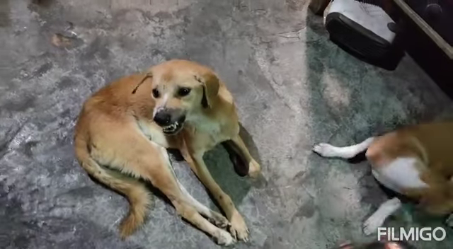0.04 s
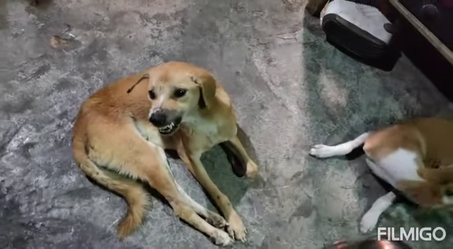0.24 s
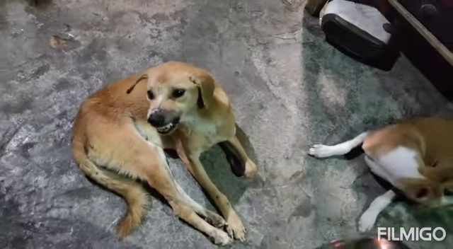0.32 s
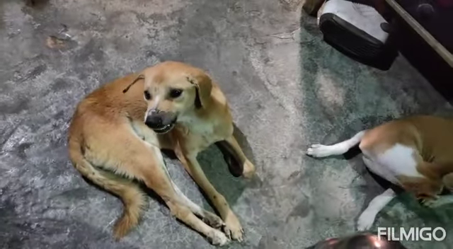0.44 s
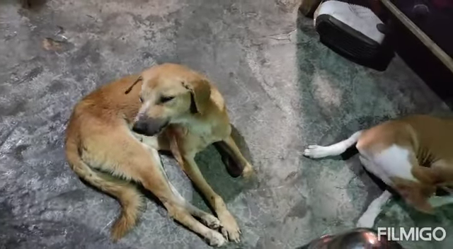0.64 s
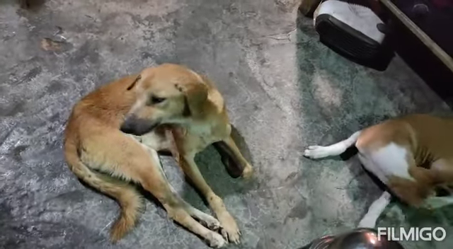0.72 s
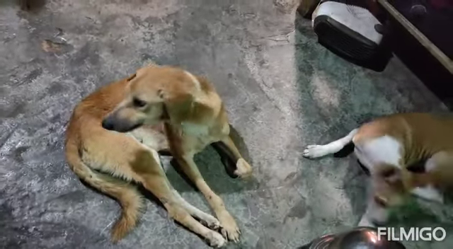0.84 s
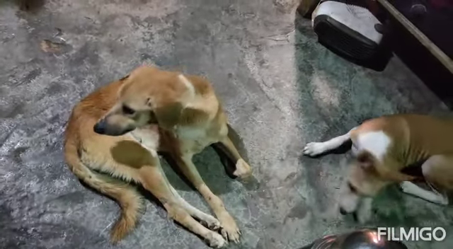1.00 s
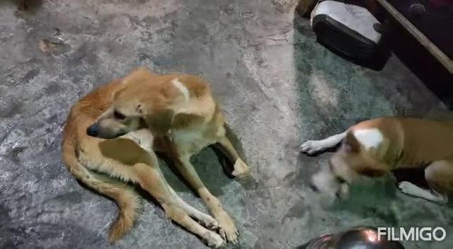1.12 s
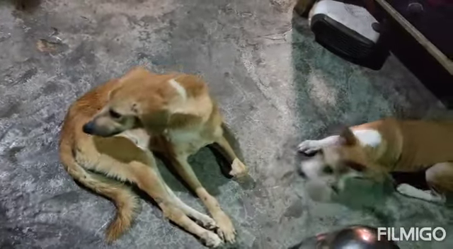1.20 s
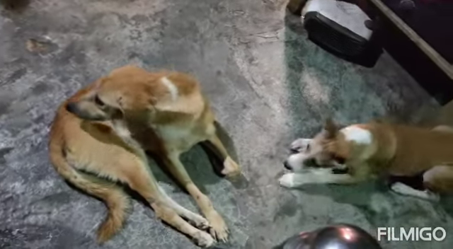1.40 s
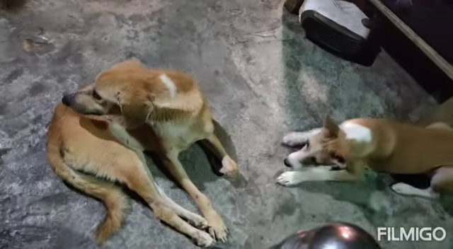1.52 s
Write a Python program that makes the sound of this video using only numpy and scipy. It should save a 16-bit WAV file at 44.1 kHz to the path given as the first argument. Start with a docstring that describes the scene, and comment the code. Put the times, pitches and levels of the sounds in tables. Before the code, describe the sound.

A low, rattling growl comes from a nearby dog, quickening and then slowing away within a second. Faint scuffs from another dog settling on the hard floor continue afterward, slightly left, over a quiet room hum.

```python
"""A quiet room with a hard floor. A dog lying there gives one short, low warning growl: its flapping mouth
beats a rattle that rings chest, mouth and teeth; the rattle speeds up, turns rough over the deep tone of its
vocal folds, then slows to separate beats as the lips close. A second dog shuffles down beside it, paws and fur
scuffing on the floor, with faint, thin whistles of narrow-band noise. The room murmurs, hums and answers with a
short echo."""
import sys
import numpy as np
from scipy import signal
from scipy.fft import rfft, irfft, next_fast_len
from scipy.io import wavfile
from scipy.ndimage import map_coordinates

SR = 44100
rng = np.random.default_rng(int(sys.argv[2]) if len(sys.argv) > 2 else 0)


def store_pcm(level_fs):
    """Save levels as 16-bit WAV."""
    pcm = np.round(np.clip(level_fs, -1, 1) * 32767).astype(np.int16)
    wavfile.write(sys.argv[1], SR, np.atleast_2d(pcm).T)


N = 68355
LEFT_LAG_S = .000379  # scuffs and whistles reach the left ear later


def amp(db):
    """Decibels to gain."""
    return 10 ** (np.asarray(db) / 20)


def unit(x):
    """Scaled to rms 1."""
    return x / np.sqrt(np.mean(x ** 2) + 1e-20)


def along(points, hz):
    """Rows of f/Hz, value, read on a log frequency axis."""
    f, v = np.transpose(points)
    return np.interp(np.log(hz + 1), np.log(f + 1), v)


def curves(rows, t):
    """Automation lanes: each column after the time, read at times t."""
    times, *lanes = np.transpose(rows)
    return [np.interp(t, times, lane) for lane in lanes]


def filtered(x, response):
    """x through an EQ given as a complex response of frequency."""
    size = next_fast_len(N + SR // 2)
    return irfft(rfft(x, size) * response(np.fft.rfftfreq(size, 1 / SR)), size)[..., :N]


def ring(x, colour, size=8192):
    """x rings a minimum-phase body of the given colour and of energy 1."""
    cepstrum = irfft(np.log(amp(along(colour, np.fft.rfftfreq(size, 1 / SR)))))
    cepstrum[1:size // 2] *= 2
    cepstrum[size // 2 + 1:] = 0
    body = irfft(np.exp(rfft(cepstrum)))
    return signal.fftconvolve(x, body / np.linalg.norm(body))[:N]


def resonate(x, hz, width_hz):
    """x through one resonance whose centre moves."""
    carrier = np.exp(2j * np.pi * np.cumsum(hz) / SR)
    pole = np.exp(-np.pi * width_hz / SR)
    return (carrier * signal.lfilter([1 - pole], [1, -pole], x / carrier)).real


def place(x, pan_db, lag_s):
    """Mono to stereo: the left is pan_db(hz) louder and lag_s later than the right."""
    side = np.array([[.5], [-.5]])
    return filtered(x, lambda hz: amp(side * pan_db(hz)) * np.exp(-2j * np.pi * hz * side * lag_s))


def swell(peak_s, rise_s, fade_s):
    """A rise and a fade, each 20 dB over its time."""
    t = np.arange(N) / SR - peak_s
    return amp(-20 * np.where(t < 0, -t / rise_s, t / fade_s))


def murmur(level_db=-60.5, waver_db=.5):
    """Room tone: a dull, steady bed of noise, nearly mono in the bass."""
    # colour of the bed: f/Hz, level/dB
    colour = [(20, -14), (33, -9.5), (45, 7), (62, -6), (85, 0), (112, 3), (150, -6), (260, -2.5),
              (340, -7), (405, -3.5), (455, -9), (545, -4), (640, -12.5), (760, -8.5), (870, -5.5),
              (970, -14), (1100, -28.5), (1500, -42.5), (2100, -47), (2550, -37.5), (3000, -57.5),
              (7000, -48), (10000, -60), (15000, -59)]
    # likeness of left and right: f/Hz, correlation
    likeness = [(60, 1), (250, 0.91), (500, 0.68), (900, .55), (2000, 0.29), (6000, 0)]
    spread = lambda hz: np.arccos(np.clip(along(likeness, hz), -1, 1)) / 2
    mid_side_eq = lambda hz: amp(along(colour, hz)) * [np.cos(spread(hz)), np.sin(spread(hz))]
    mid, side = filtered(rng.standard_normal((2, N)), mid_side_eq)
    waver = map_coordinates(rng.standard_normal(20), [np.arange(N) * 10 / SR])
    return amp(level_db + waver_db * waver) * unit(np.array([mid + side, mid - side]))


def hum():
    """A faint hum in the room: sine tones whose phase drifts slightly."""
    # steady tones: f/Hz, level/dB
    tones = [(403, -75.5), (549, -76.5)]
    t = np.arange(N) / SR
    drift = lambda: map_coordinates(rng.standard_normal(12), [t * 5])
    return sum(amp(db) * np.sqrt(2) * np.sin(2 * np.pi * hz * t + drift()) for hz, db in tones)


def scuffs(grains_per_s=8000, scatter_db=4, edge_slope=9):
    """Fur and pads drag over the gritty floor: dense tiny grains under each stroke."""
    # strokes: peak t/s, level/dB, rise/s, fade/s, pan L-R/dB, low cut/Hz, high cut/Hz
    strokes = [(0.086, -79, .03, 0.1, 5, 3500, 16200), (.172, -67.5, 0.056, 0.24, 3.5, 4180, 16000),
               (0.371, -62, 0.065, 0.1676, 2.5, 4360, 8870), (.652, -72.5, .04, 0.04, 3.5, 6510, 5950),
               (.83, -80, 0.042, 0.07, 6.5, 4300, 7300), (.97, -82.5, 0.029, 0.17, 9, 4970, 9600),
               (1.06, -74, 0.014, 0.22, 7.5, 5540, 12900), (1.275, -83, 0.14, 0, 9.5, 6150, 10000),
               (1.437, -76, 0.095, 0.22, 7, 6000, 11200)]
    # colour of the grit: f/Hz, level/dB
    colour = [(1000, -15), (2500, -7), (3400, -10.5), (4400, -9), (5500, -3), (6200, -2.5), (6720, 5.5),
              (7400, -5), (9000, -8), (11000, -11.5), (15500, -12)]
    out = np.zeros((2, N))
    for peak_s, db, rise_s, fade_s, pan_db, low_hz, high_hz in strokes:
        grains = (rng.random(N) < grains_per_s / SR) * rng.standard_normal(N)
        grains *= amp(scatter_db * rng.standard_normal(N))
        low_cut = lambda hz: 1 / (1 + (low_hz / (hz + 1)) ** edge_slope)
        high_cut = lambda hz: 1 / (1 + (hz / high_hz) ** edge_slope)
        grit = filtered(grains, lambda hz: amp(along(colour, hz)) * low_cut(hz) * high_cut(hz))
        stroke = amp(db) * unit(grit) * swell(peak_s, rise_s, fade_s)
        out += place(stroke, lambda hz: pan_db, LEFT_LAG_S)
    return out


def thin_whistles(pan_db=7.5):
    """Faint, thin whistles on the left: narrow bands of noise that swell and fade."""
    # noise bands: peak t/s, f/Hz, width/Hz, level/dB, rise/s, fade/s
    bands = [(.09, 1545, 89.4, -84.5, .03, .25), (.16, 2375, 250, -82.5, 0.098, 0.4),
             (.45, 6626, 346, -73.5, 0.3, 0.26), (.67, 6700, 500, -73, .03, .15),
             (.735, 3450, 553, -78, .08, 0.13), (1.065, 1370, 111, -81, .04, 0.2),
             (1.07, 1853, 190, -79, .04, 0.1), (1.09, 3300, 280, -79, 0.056, .2),
             (1.26, 4530, 170, -88.5, 0.19, .27), (1.505, 3720, 130, -90, .03, .1)]
    out = np.zeros(N)
    for peak_s, hz, width_hz, db, rise_s, fade_s in bands:
        resonance = lambda f: (1j * f * width_hz / (hz * hz - f * f + 1j * f * width_hz)) ** 2
        whistle = unit(filtered(rng.standard_normal(N), resonance))
        out += amp(db) * whistle * swell(peak_s, rise_s, fade_s)
    return place(out, lambda hz: pan_db, LEFT_LAG_S)


def growl(rough_hz=135, jitter_s=.0008, shimmer_db=1.5):
    """Uneven beats of the flapping mouth, each with a puff of air, ring the chest, mouth and gap in the teeth."""
    # rattle of the flapping mouth: t/s, beat rate/Hz
    flaps = [(.247, 74.1), (.28, 77.5), (.32, 122), (.38, 120.1), (.42, 136.8), (.46, 116.8), (.52, 117.7),
             (.56, 127.4), (.59, 97), (.64, 124.3), (.675, 90), (.71, 91.9), (.745, 73.8), (.785, 86.4),
             (.825, 64.5), (.897, 68.8)]
    # drive of the three registers: t/s, chest level/dB, mouth level/dB, teeth level/dB
    effort = [(.247, -53.5, -52.5, -77), (.274, -47, -46, -67.5), (.3, -48, -46, -68.5),
              (.324, -44.5, -42, -65.5), (.333, -49, -55, -69.5), (.345, -45, -46, -61.5),
              (.365, -46.5, -44.5, -61), (.373, -46.5, -59, -64), (.384, -44, -44, -59),
              (.403, -47.5, -59, -68.5), (.417, -46.5, -49.5, -60.5), (.435, -44, -44.5, -63),
              (.444, -46, -49.5, -62), (.485, -46.5, -43.5, -66.5), (.497, -49, -61, -69.5),
              (.52, -46, -44, -62.5), (.545, -46, -54, -68.5), (.556, -44, -46, -62), (.588, -53, -61, -72),
              (.604, -48, -47.5, -62.5), (.617, -51.5, -56, -71), (.65, -48, -52, -68.5),
              (.71, -48, -52.5, -62), (.775, -50, -56, -68), (.812, -55, -62.5, -77.5),
              (.848, -52, -55.5, -69.5), (.888, -52.5, -62.5, -75)]
    # moving resonances as the lips close: t/s, mouth f/Hz, teeth f/Hz
    jaw = [(.26, 840, 1940), (.37, 845, 2310), (.49, 858, 2304), (.57, 783, 2300), (.68, 825, 2510),
           (.89, 814, 2534)]
    # steady colours of chest, open mouth and muzzle: f/Hz, level/dB
    chest_colour = [(40, -44), (75, -21), (110, -6.5), (150, -2.5), (185, 1.5), (215, -6), (245, -3),
                    (295, -8.5), (345, 1), (385, -12), (435, -12), (490, -22.5), (650, -22), (1300, -61),
                    (3000, -110)]
    mouth_colour = [(300, -26.5), (560, -8), (680, -5.5), (770, -0.5), (870, 1.5), (945, -8), (1070, -12.5),
                    (1200, -10.5), (1400, -23.5), (2000, -47.5), (4000, -90)]
    muzzle_colour = [(900, -14), (1400, 3), (1880, 7), (2150, -2), (2400, 1), (2720, 1), (3050, -9),
                     (3450, -1), (4000, 2), (4550, -22), (7000, -4), (8000, -30)]
    # stereo image of the growl: f/Hz, pan L-R/dB
    pan = [(200, 0), (380, -.5), (750, -3.5), (1290, 0), (2380, 6.5), (4400, 3)]

    t = np.arange(N) / SR
    rate, = curves(flaps, t)
    chest_db, mouth_db, teeth_db = curves(effort, t)
    mouth_hz, teeth_hz = curves(jaw, t)
    rough = (rate / rough_hz) ** 2  # scales jitter and shimmer: slower beats are more regular
    cycles = np.cumsum(rate * (t > flaps[0][0]) * (t < flaps[-1][0])) / SR
    onsets = np.searchsorted(cycles, np.arange(int(cycles[-1]) + 1), side="right").clip(0, N - 1)
    time_scatter, chest_scatter, mouth_scatter = rng.standard_normal((len(onsets), 3)).clip(-2, 2).T
    onsets = (onsets + jitter_s * SR * rough[onsets] * time_scatter).astype(int).clip(0, N - 1)

    def beats(level_db, scatter, air, puff_s=.004):
        """The train of beats, part click and part puff; air is the puffs' share of the power."""
        shimmer = unit(amp(shimmer_db * rough[onsets] * scatter))
        sizes = shimmer * amp(level_db[onsets]) * np.sqrt(SR / rate[onsets])
        clicks = np.bincount(onsets, sizes, N)
        puff = np.exp(-2 * t[:SR // 20] / puff_s)
        puff_power = abs(signal.fftconvolve(clicks ** 2, puff / puff.sum())[:N])
        hiss = np.sqrt(puff_power) * rng.standard_normal(N)
        return np.sqrt(1 - air) * clicks + np.sqrt(air) * hiss

    chest = ring(beats(chest_db + .5, chest_scatter, air=.25 * rough), chest_colour)
    snarl = beats(mouth_db, mouth_scatter, air=.22, puff_s=.009)  # the puff lingers in the mouth
    mouth = snarl.std() * unit(resonate(ring(snarl, mouth_colour), mouth_hz, width_hz=127))
    rasp = beats(teeth_db, mouth_scatter, air=.75)
    gap = lambda x: resonate(x, teeth_hz, width_hz=620)
    teeth = rasp.std() * unit(gap(gap(ring(rasp, muzzle_colour))))  # twice: steep skirts, soft attack
    return place(chest + mouth + teeth + drone(), lambda hz: along(pan, hz), lag_s=.00013)


def drone(waver_depth=.057, wavers_per_s=70):
    """The folds' own deep, unsteady tone, sinking as the effort ebbs."""
    # tone under the rattle: t/s, f/Hz, level/dB
    contour = [(.28, 165, -62), (.315, 135.2, -49), (.36, 140.1, -45.5), (.41, 124.9, -54.5),
               (.49, 145.8, -45.5), (.55, 125.7, -46.5), (.65, 120.2, -50.5), (.7, 113, -65.5)]
    t = np.arange(N) / SR
    hz, db = curves(contour, t)
    waver = map_coordinates(rng.standard_normal(N), [t * wavers_per_s])
    phase = 2 * np.pi * np.cumsum(hz * (1 + waver_depth * waver)) / SR
    gate = np.clip(np.minimum(t - contour[0][0], contour[-1][0] - t) * hz, 0, 1)  # one-cycle fades
    return amp(db) * gate * np.sqrt(2) * np.sin(phase)


def room(x):
    """A short echo off floor and walls, different at each ear."""
    # time the tail takes to fall 60 dB: f/Hz, t/s
    decay = [(150, .25), (900, 0.23), (3000, .18), (10000, .1)]
    # EQ of the echo: f/Hz, level/dB
    colour = [(100, -21), (300, -16), (800, -8), (2300, -3.5), (7000, .5)]
    hz, t, noise = signal.stft(rng.standard_normal((2, SR // 3)), SR, nperseg=256)
    fade = amp(-60 * t / along(decay, hz)[:, None])
    _, tail = signal.istft(noise * fade, SR, nperseg=256)
    echo = signal.fftconvolve(x, tail / np.linalg.norm(tail[0]), axes=1)[:, :N]
    return filtered(echo, lambda hz: amp(along(colour, hz)))


def scene():
    """Both dogs, the whistles and their echo over the room tone."""
    direct = growl() + scuffs() + thin_whistles()
    return direct + room(direct) + murmur() + hum()


def record(dry):
    """A brick-wall high cut on the mix at 15.7 kHz."""
    return filtered(dry, lambda hz: hz < 15700)


dry = scene()
out = record(dry)
store_pcm(out)
```